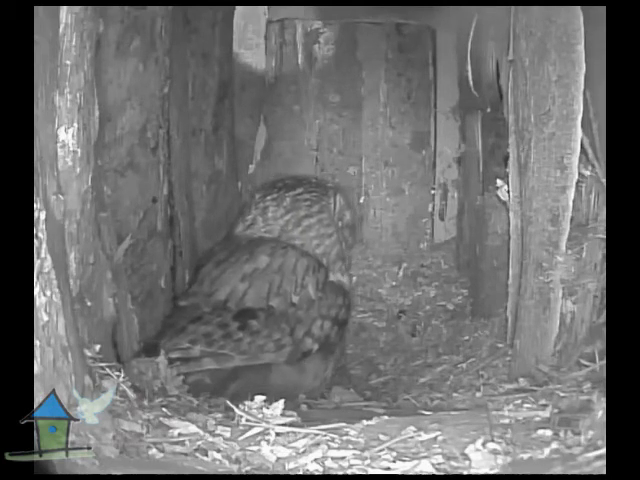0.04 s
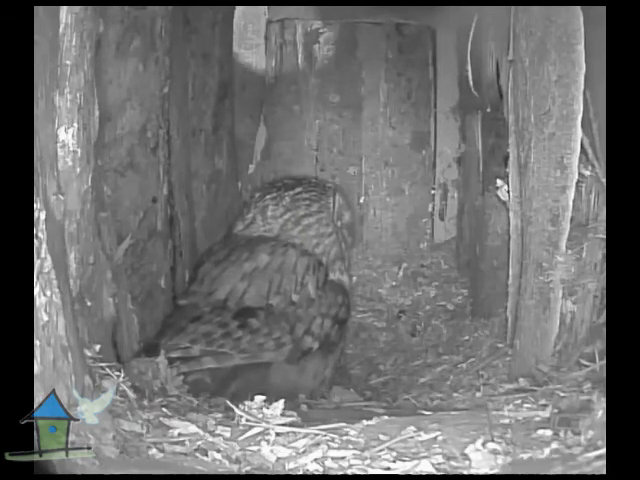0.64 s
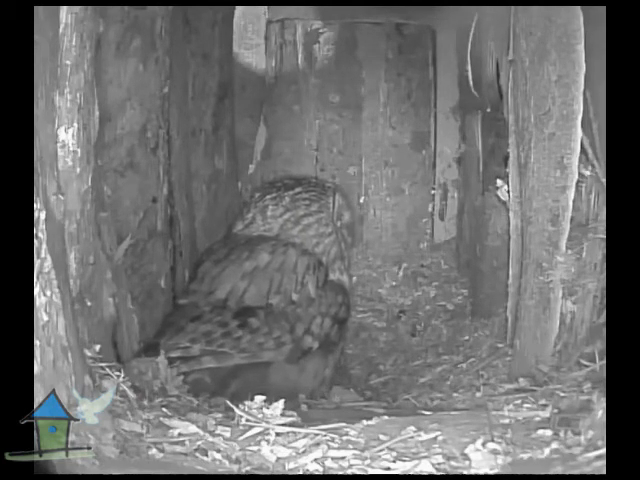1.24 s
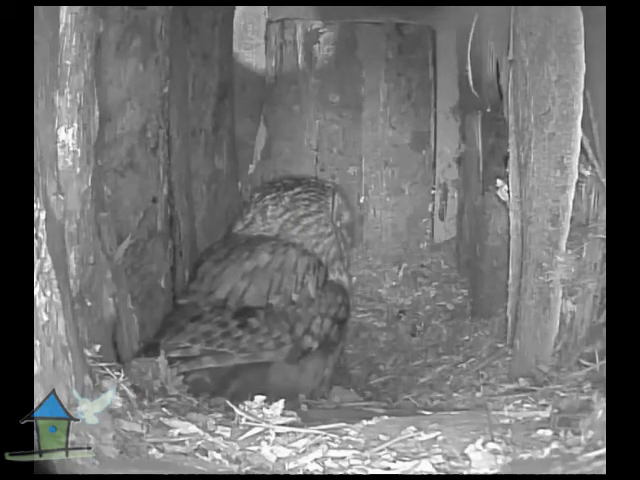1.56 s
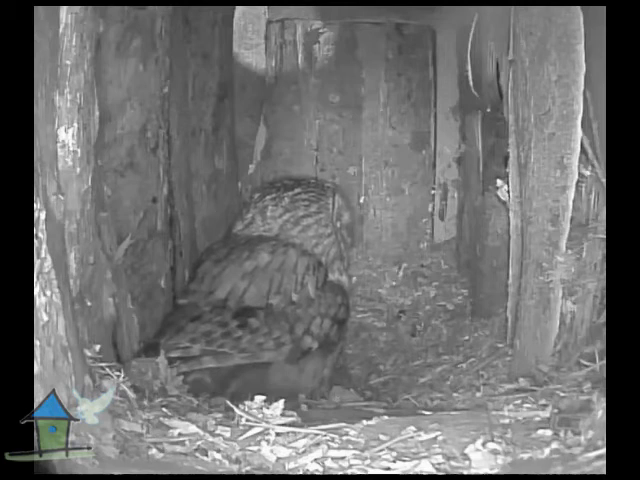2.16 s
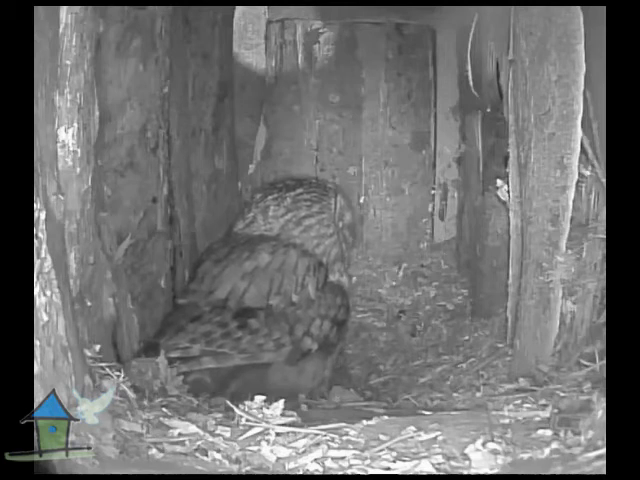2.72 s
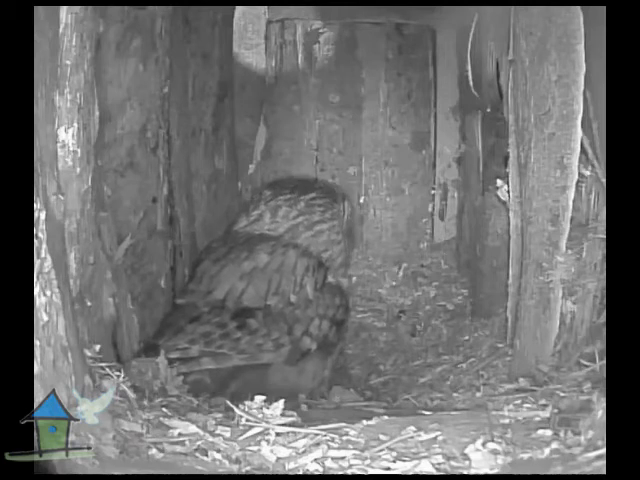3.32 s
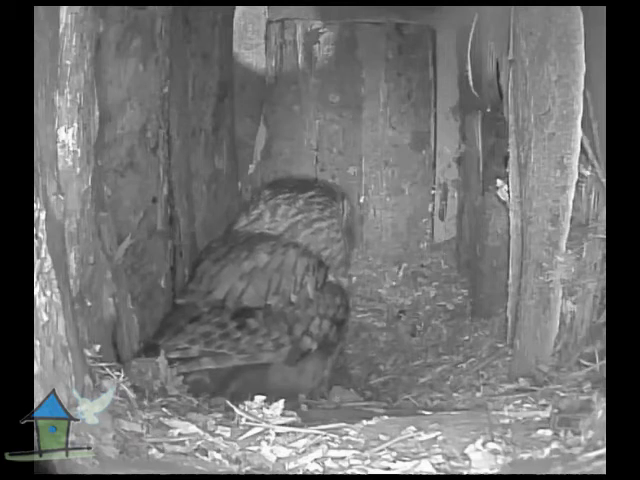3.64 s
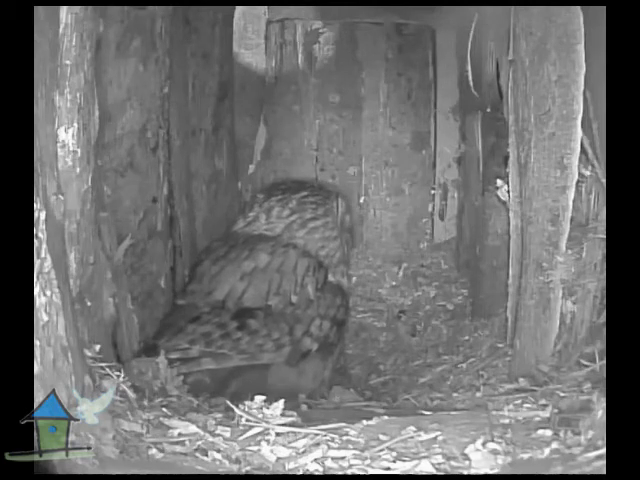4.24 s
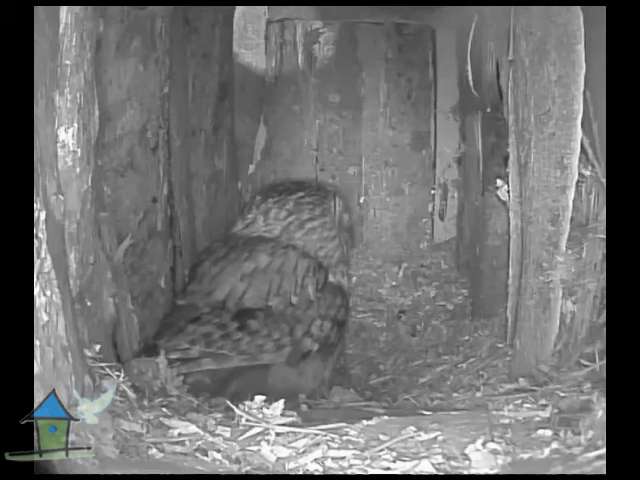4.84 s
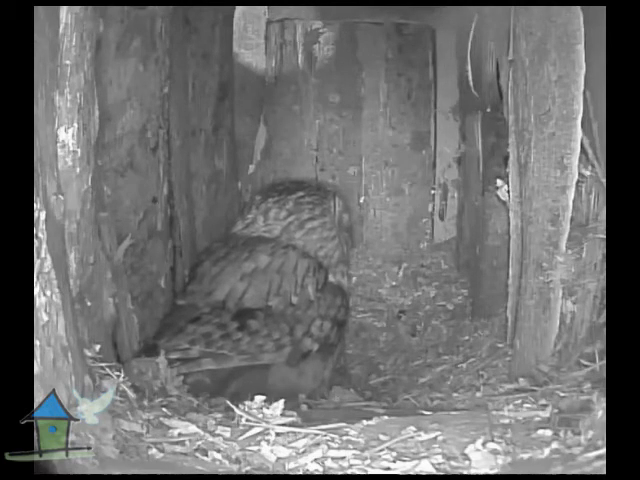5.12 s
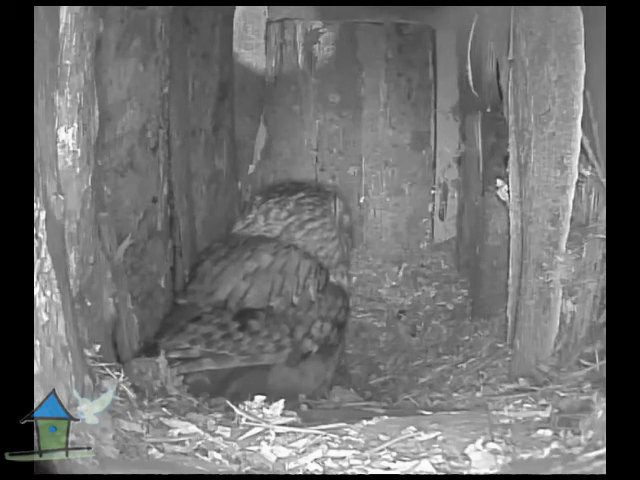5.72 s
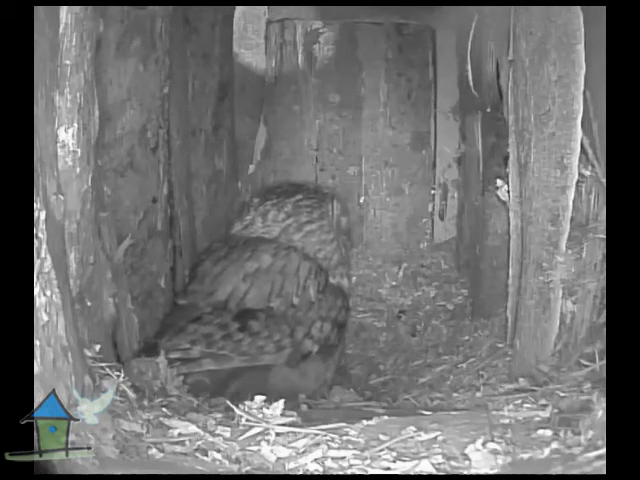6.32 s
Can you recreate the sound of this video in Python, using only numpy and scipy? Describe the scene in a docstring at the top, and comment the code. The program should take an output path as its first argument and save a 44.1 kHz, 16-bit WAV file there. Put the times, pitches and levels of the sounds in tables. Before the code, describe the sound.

An owl gives two short rising squeals close by inside a wooden nest box, over a quiet low rumble and hiss.

```python
"""An owl gives two short rising squeals inside a wooden nest box, close to a small camera microphone.
Its breath shakes thin membranes in its voice organ: each call starts as a thin whine, rasps as it breaks
upward and ends in a bright, clean whistle. The wooden walls add a very short echo.
Something taps in the litter, faint hoots carry from far off, and a low rumble and hiss lie under it all."""
import sys
import numpy as np
from scipy import signal
from scipy.fft import rfft, irfft
from scipy.io import wavfile
from scipy.ndimage import uniform_filter1d

SR = 44100
rng = np.random.default_rng(int(sys.argv[2]) if len(sys.argv) > 2 else 0)


def persist_wave(psi):
    """Save psi, clipped to +-1, as 16-bit WAV."""
    counts = np.round(np.clip(psi, -1, 1) * 32767).astype(np.int16)
    wavfile.write(sys.argv[1], SR, np.atleast_2d(counts).T)


N = 285327
T = np.arange(N) / SR
FREQ = np.arange(N // 2 + 1) * SR / N


def undb(db):
    """Turn decibels into a factor to multiply by."""
    return 10 ** (np.asarray(db) / 20)


def unit(x):
    """Scale a signal so that its average size (rms) is 1."""
    return x / np.sqrt(np.mean(x ** 2))


def bell(x, centre, half_width):
    """A smooth bump of height 1."""
    return np.exp(-((x - centre) / half_width) ** 2)


def filtered(x, gain):
    """Turn each frequency of a sound up or down by its own gain."""
    return irfft(rfft(x) * gain, N)


def gain_at(hz, points):
    """Read gains off a curve drawn through (frequency [Hz], level [dB]) points."""
    f, db = np.transpose(points)
    return undb(np.interp(np.log(np.maximum(hz, 1)), np.log(f), db))


def band_gains(bands):
    """Gains with a steep-sided peak for each (frequency [Hz], width [Hz], level [dB]) band."""
    return sum(undb(db) / (1 + (2 * (FREQ - hz) / width) ** 4) for hz, width, db in bands)


def noise(points):
    """Noise of size 1 whose mix of low and high follows the given curve."""
    return unit(filtered(rng.standard_normal(N), gain_at(FREQ, points)))


def wander(rate_hz):
    """A random wobble of size 1, mostly slower than the given rate."""
    return unit(filtered(rng.standard_normal(N), 1 / (1 + (FREQ / rate_hz) ** 4)))


def background(rumble_db=-52.0, hiss_db=-72, flutter_db=1.0):
    """A low humming rumble and an even, slightly hollow hiss."""
    # tone of the rumble and of the hiss: (frequency [Hz], relative level [dB])
    rumble_colour = [(8, -0.5), (20, 3.5), (35, -12), (47, 4), (54, -2.5), (62, 1.5), (72, -9.5),
                     (85, -20.5), (125, -27), (250, -48)]
    hiss_colour = [(90, 2.5), (180, 9), (235, 12), (270, 6.5), (500, 3.5), (800, -0.5), (1300, -3.5),
                   (2000, 0), (2800, -7), (3600, -2), (4800, -10), (5500, -2), (10000, -17), (15000, -14)]
    # box resonances that make the hiss hollow: (frequency [Hz], width [Hz], level against plain hiss [dB])
    hollow_modes = [(1096, 97, -2), (1296, 46, 3), (1553, 50, 1.5), (1766, 47, -2.5), (2035, 18, 0.5),
                    (2790, 30, -8)]
    hiss = unit(filtered(noise(hiss_colour), 1 + band_gains(hollow_modes)))
    rumble = undb(rumble_db) * noise(rumble_colour)
    return rumble + undb(hiss_db + flutter_db * wander(24)) * hiss


def far_hoots(sag=0.016, blur=0.11):
    """Soft, nearly pure notes that sink a little, blurred by the forest."""
    # distant hoots: (start [s], length [s], pitch [Hz], level [dB])
    hoots = [(1.676, 0.24, 447, -74.5), (2.739, 0.24, 540, -73.5), (4.635, 0.3, 545, -77),
             (6.15, 0.12, 530, -75.5)]
    out = np.zeros(N)
    for start, length, hz, db in hoots:
        progress = np.clip((T - start) / length, 0, 1)
        phase = 2 * np.pi * np.cumsum(hz * (1 - sag * (progress - .5))) / SR
        out += undb(db) * np.sin(np.pi * progress) * np.sin(phase)
    return out * (1 + blur * wander(15.3))


def litter_taps(crack_db=-7, crack_s=0.0018, cutoff_hz=3800):
    """Each light tap makes the litter crack softly and the floor boards ring briefly."""
    # taps in the litter: (time [s], relative level [dB])
    taps = [(5.714, -59), (5.7456, -49), (5.7503, -60), (5.7664, -60), (5.771, -59), (5.792, -60)]
    # ringing tones of the floor: (frequency [Hz], time to fade by 60 dB [s], relative level [dB])
    floor_modes = [(222, 0.079, -12.5), (415, 0.056, -16), (676, 0.02, 0.5), (1086, 0.016, -0.5),
                   (1380, 0.014, -0.5), (1980, 0.0069, 1.5), (3970, 0.01, 1)]
    out = np.zeros(N)
    t = T[:SR // 10]
    ring = sum(undb(db - 60 * t / ring_s) * np.sin(2 * np.pi * hz * t) for hz, ring_s, db in floor_modes)
    for time, db in taps:
        crack = undb(crack_db) * np.exp(-t / crack_s) * rng.standard_normal(len(t))
        start = int(time * SR)
        out[start:start + len(t)] += undb(db) * (.5 * ring + crack)
    return signal.sosfilt(signal.butter(2, cutoff_hz, fs=SR, output="sos"), out)


def nest_box(sound, wall_db=-16, wall_s=.08, tail_db=-30, tail_s=.19):
    """Close wooden walls add a quick flurry of echoes and a faint, short tail."""
    # the owl faces the wall, so echoes are brighter than the direct sound: (frequency [Hz], boost [dB])
    wall_colour = [(1300, 0), (2700, 2), (4200, 4), (8000, 2.5)]
    reflected = filtered(sound, gain_at(FREQ, wall_colour))
    t = T[:SR // 2]
    out = sound
    for db, fade_s in ((wall_db, wall_s), (tail_db, tail_s)):
        echo = rng.standard_normal(len(t)) * undb(-60 * t / fade_s) * (t > .002)
        out = out + undb(db) * signal.fftconvolve(reflected, echo / np.linalg.norm(echo))[:N]
    return out


def standing_waves(hz):
    """Waves bouncing between the walls lift or swallow an overtone that glides through them."""
    # peaks and dips of the box: (frequency [Hz], half-width [Hz], boost or cut [dB])
    waves = [(2141, 65, -15.5), (2500, 35, -5.5), (3190, 110, -6), (3560, 80, 4), (4410, 62, 8.5),
             (4780, 110, 3), (5300, 230, -4)]
    return undb(sum(db * bell(hz, centre, width) for centre, width, db in waves))


def note_shape(note, course, sag=.18, break_hz=1188, break_width_hz=46, thin_db=-22.5):
    """How a note moves: it fades in, follows its course, then fades out as its pitch sags."""
    start, end, attack, release, octave_db, overtone_db, tilt_db = note
    times, *columns = np.transpose(course)
    held_hz, db = (uniform_filter1d(np.interp(T, times, column), size=220) for column in columns)
    left = np.clip((end - T) / release, 0, 1)
    fade = np.sin(np.pi / 2 * left)
    hz = held_hz * (1 - sag * (1 - left) ** 2)
    strength = np.sqrt(2) * undb(db) * np.clip((T - start) / attack, 0, 1) * fade
    # below the break pitch the bright whistle thins to a whine
    thin = .5 - .5 * np.tanh((hz - break_hz) / break_width_hz)
    # the higher tones die away sooner than the base tone
    octave_gain = undb(octave_db) * fade ** 1.2
    overtone_gain = undb(overtone_db + thin_db * thin) * fade ** 2.8
    return hz, strength, octave_gain, overtone_gain, tilt_db


def period_doubling(t, centre_s=4.401, half_length_s=0.013, peak_db=-22.5):
    """How strongly strong and weak vibrations take turns, briefly, at the top of the long call."""
    return undb(peak_db) / (1 + ((t - centre_s) / half_length_s) ** 2)


def membrane(hz, strength, octave_gain, overtone_gain, tilt_db, rasp,
             waver=0.0024, jitter=0.03, shimmer=0.19, undertone_db=-8):
    """One vibrating membrane whistles with overtones; swirling air shakes its pitch and loudness."""
    # how throat and beak colour the overtones: (frequency [Hz], boost or cut [dB])
    throat = [(2600, 4), (3000, 2), (3300, -3), (3600, -4), (4000, 0), (4500, 0), (4900, -7.5), (5250, -13),
              (5800, -11.5), (7000, -18.5), (8400, -16.5), (10000, -29.5), (11700, -24), (13000, -30.5),
              (14500, -31.5)]
    on = strength > 0
    hz, strength, octave_gain, overtone_gain = hz[on], strength[on], octave_gain[on], overtone_gain[on]
    rough = np.minimum(rasp[on] / strength, .5)
    shaken_hz = hz * (1 + waver * wander(90)[on] + jitter * rough * wander(220)[on])
    phase = 2 * np.pi * np.cumsum(shaken_hz) / SR
    overtones = 0
    for k in range(3, 13):
        colour = gain_at(k * hz, throat) * standing_waves(k * hz) * undb(tilt_db * np.log2(k / 3))
        overtones = overtones + colour * np.sin(k * phase)
    upper = octave_gain * standing_waves(2 * hz) * np.cos(2 * phase) + overtone_gain * overtones
    # alternating strong and weak vibrations add faint tones half-way between the usual ones
    between = period_doubling(T[on]) * np.cos(phase / 2) * (upper + undb(undertone_db))
    tremble = 1 + shimmer * rough * wander(170)[on]
    out = np.zeros(N)
    out[on] = strength * (np.sin(phase) + upper + between) * tremble
    return out


def owl(steady_rasp_db=-42.5, burst_db=2.5, air_db=-37, rasp_air_db=-14):
    """The voice organ has two sides: they overlap in the first call; one glides alone in the second."""
    # whine and squeal of the first call, then the glide of the second: (start [s], end [s], fade-in [s],
    # fade-out [s], octave [dB], higher overtones [dB], their tilt [dB per octave]); 0 dB is the base tone
    notes = [(0.978, 1.134, .007, 0.029, 0, 1, -0.5), (1.082, 1.188, .016, .048, -0.5, -2.5, -3.5),
             (4.136, 4.493, 0.0088, 0.085, -3, -4, 0.5)]
    # the course each note follows: (time [s], pitch [Hz], level of the base tone [dB])
    whine = [(0.984, 923, -42), (1.004, 878, -35), (1.02, 916.6, -34), (1.044, 845, -41), (1.062, 948, -36),
             (1.096, 1032, -31.5), (1.104, 1054, -36.5)]
    squeal = [(1.098, 1318, -38), (1.118, 1312, -27), (1.142, 1326, -29)]
    glide = [(4.144, 1088, -35), (4.158, 1167, -35), (4.168, 1172, -34.5), (4.198, 1073, -29.5),
             (4.234, 1075, -29.5), (4.256, 1103, -30), (4.278, 1170, -34.5), (4.294, 1242, -28),
             (4.306, 1333, -26), (4.332, 1403, -25.5), (4.372, 1435, -24.5), (4.424, 1453, -27)]
    # air swirls in the throat as a note starts, breaks or ends: (time [s], half-length [s], level [dB])
    swirls = [(1.007, 0.022, -60.5), (1.06, .02, -53), (1.1, 0.009, -47.5), (1.119, .012, -50.5),
              (1.174, .012, -59.5), (4.143, .003, -54.5), (4.255, 0.03, -48.5), (4.296, .032, -47),
              (4.458, 0.0079, -60.5)]
    # bands that colour the rasp's hiss: (frequency [Hz], width [Hz], relative level [dB])
    rasp_bands = [(1280, 200, 4.5), (1830, 40, -0.5), (2130, 230, 1.5), (2600, 660, -2), (3420, 320, -1),
                  (3740, 160, -0.5), (4410, 160, 3), (5120, 150, -8), (7330, 3200, -17.5)]
    # low box resonances stirred by the breath: (frequency [Hz], width [Hz], relative level [dB])
    air_modes = [(240, 48, -8), (406, 110, -8), (560.2, 260, -11.5), (717, 130, -2), (980, 120, -1.5)]
    shapes = [note_shape(note, course) for note, course in zip(notes, (whine, squeal, glide))]
    rasp = sum(undb(db) * bell(T, time, half_length) for time, half_length, db in swirls)
    rasp = rasp + undb(steady_rasp_db) * sum(strength for hz, strength, *timbre in shapes)
    voice = sum(membrane(*shape, rasp) for shape in shapes)
    # the swirling comes in quick uneven bursts
    bursts = rasp * undb(burst_db * wander(78)) * rng.standard_normal(N)
    coloured_rasp = filtered(bursts, unit(band_gains(rasp_bands)))
    # the breath stirs the box more when the note is loud or rough
    effort = uniform_filter1d(np.abs(voice), size=400)
    air = (undb(air_db) * effort + undb(rasp_air_db) * rasp) * rng.standard_normal(N)
    return voice + coloured_rasp + filtered(air, unit(band_gains(air_modes)))


def scene():
    """Owl and taps in the box, with the night outside, in one channel."""
    return (nest_box(owl() + litter_taps()) + far_hoots() + background())[None]


def record(dry, treble_hz=4970, treble_db=-21, mirror_hz=12100, mirror_db=-37, top_hz=14900):
    """The small camera turns the treble down, and its converter adds a faint mirror image of the highs."""
    treble_step = np.where(FREQ < treble_hz, 1, undb(treble_db))
    sound = filtered(dry, uniform_filter1d(treble_step, size=400))
    highs = signal.sosfilt(signal.butter(10, 3800, "high", fs=SR, output="sos"), sound)
    mirror = 2 * highs * np.cos(2 * np.pi * mirror_hz * T)
    top_cut = signal.ellip(8, .2, 70, top_hz, fs=SR, output="sos")
    return signal.sosfilt(top_cut, sound + undb(mirror_db) * mirror)


dry = scene()
out = record(dry)
persist_wave(out)
```